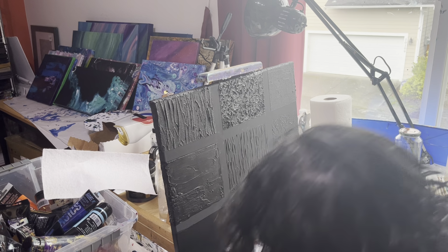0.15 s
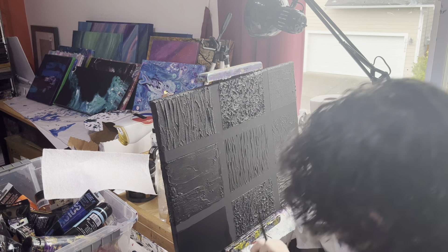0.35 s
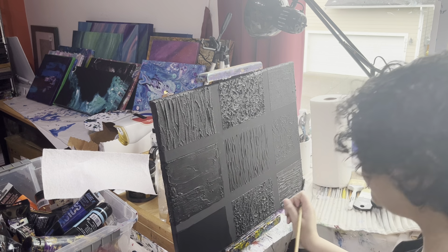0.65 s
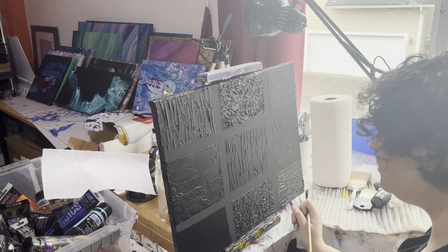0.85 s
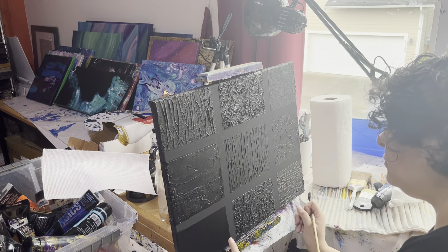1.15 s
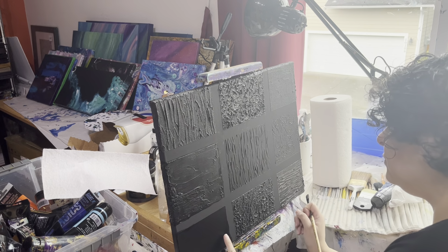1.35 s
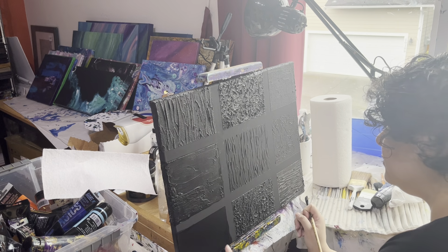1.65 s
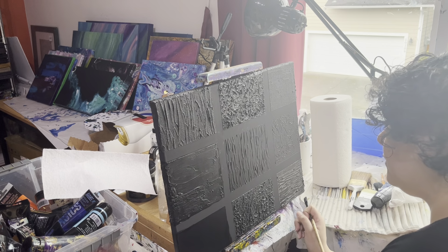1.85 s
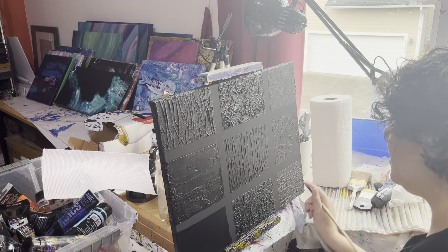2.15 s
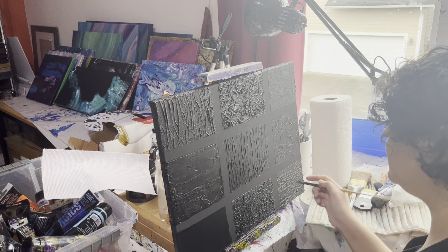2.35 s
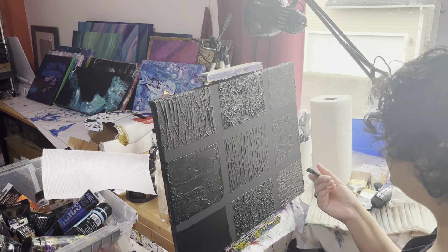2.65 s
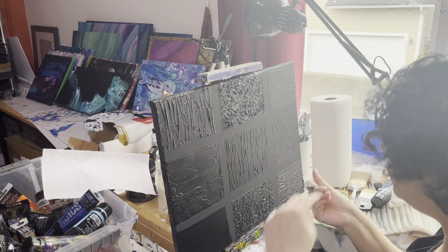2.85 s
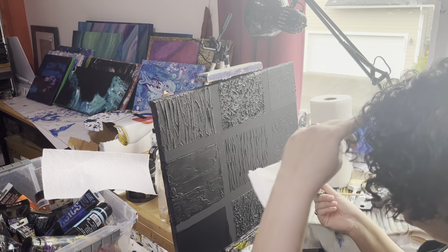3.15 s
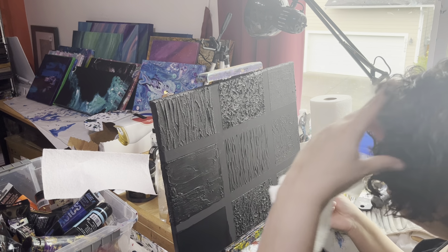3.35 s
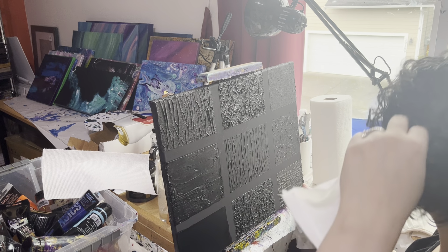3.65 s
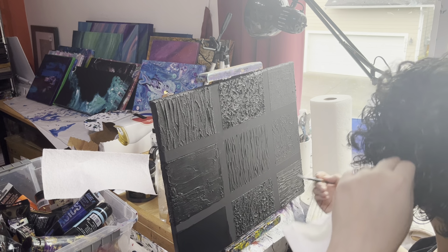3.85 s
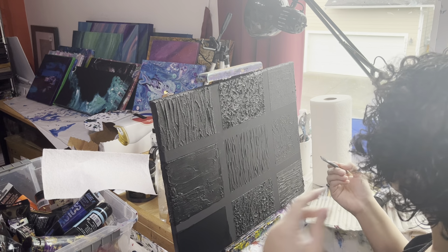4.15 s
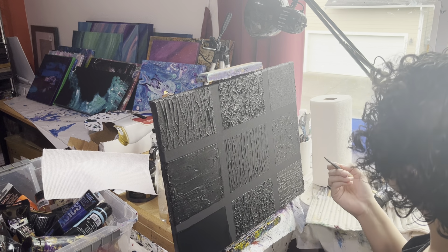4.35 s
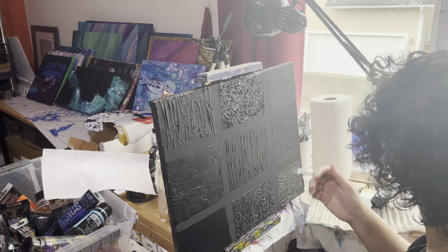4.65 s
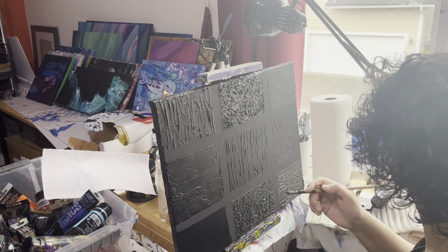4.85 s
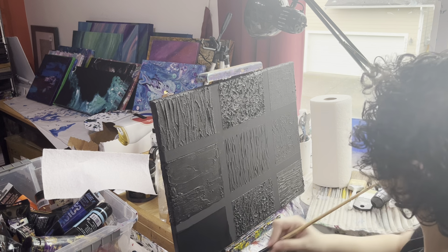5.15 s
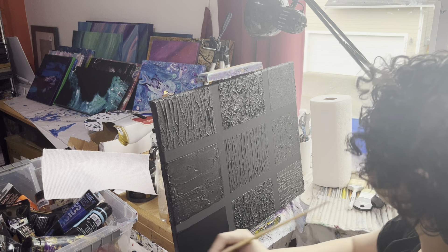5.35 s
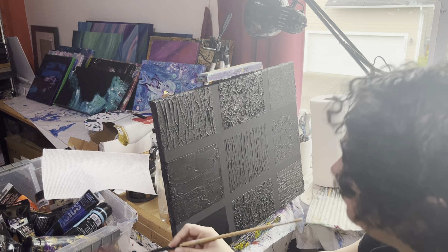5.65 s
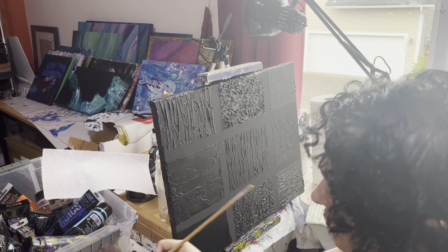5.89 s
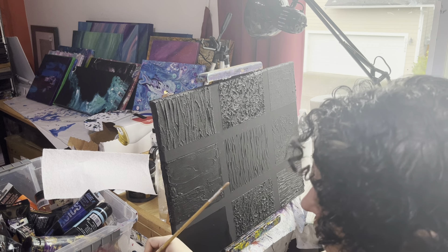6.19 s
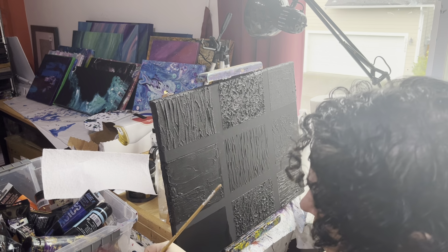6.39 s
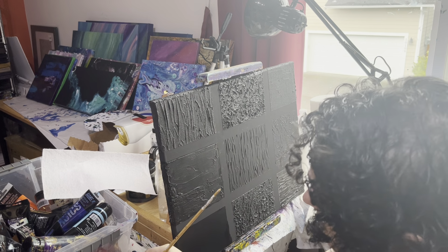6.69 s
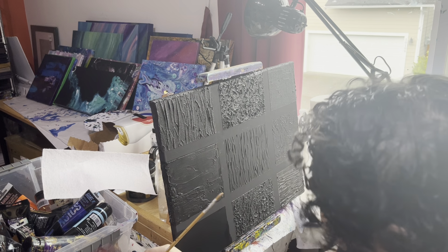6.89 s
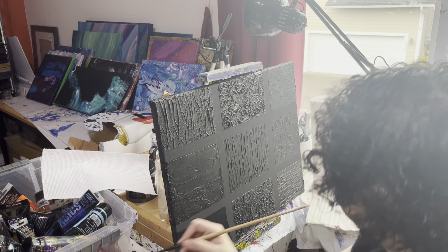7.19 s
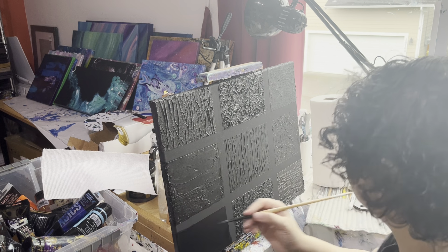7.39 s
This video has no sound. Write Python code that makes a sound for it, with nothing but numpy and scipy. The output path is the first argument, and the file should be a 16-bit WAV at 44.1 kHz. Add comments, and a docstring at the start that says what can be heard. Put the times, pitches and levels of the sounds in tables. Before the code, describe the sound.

A deep, steady motor hum, slightly wavering, lies under faint room air and a barely audible thin whine for the whole stretch. From 0 to 1.1 s a painter moves about, with overlapping crackly swishes of cloth, paper and bristles, rubbing drags on the table and a few small clicks. Light wooden ticks follow from 1.2 s, bunching with a short scuff at about 1.75 s. Rustling returns at 2.3 to 2.9 s with a soft bump at 2.4. A strong hollow table knock with a rattle lands near 3.1 s, another near 3.9. Smaller bumps and a brush of cloth come at 4.5 to 5.1 s. A lull holds only sparse, faint rustles until delicate taps at 6.6 to 7.0 s. A harder, brighter cluster of knocks and clatter strikes near 7.3 s, with small bumps to the end. Close stereo microphone, small dry room.

```python
"""A motor hums under faint room air and a thin whine while a painter shifts about at a work table.
Swishes of cloth, paper and bristles (tilted noise) and drags (rubbing noise, part through table modes)
crowd the first second; ticks (damped sines with noise) run on to 1.8 s. From 2.4 to 5.1 s bumps excite
the table modes and a rattle, strongest near 3.1 and 3.9 s. A lull follows, with sparse rustles, then taps
from 6.6 s and a last cluster of bumps near 7.3 s. Two ports hear all this with differing treble phase."""
import sys
import numpy as np
from scipy import signal
from scipy.fft import rfft, irfft, next_fast_len
from scipy.io import wavfile

SR = 44100
rng = np.random.default_rng(int(sys.argv[2]) if len(sys.argv) > 2 else 0)


def persist_wave(psi):
    """Save psi, clipped to +-1, as 16-bit WAV."""
    counts = np.round(np.clip(psi, -1, 1) * 32767).astype(np.int16)
    wavfile.write(sys.argv[1], SR, np.atleast_2d(counts).T)


N = 331896


def from_db(db):
    """Level: decibels to amplitude gain."""
    return 10 ** (np.asarray(db) / 20)


def rms_one(x):
    """Normalisation: scale to unit rms."""
    return x / np.sqrt(np.mean(x ** 2) + 1e-20)


def in_time(rows):
    """Linear interpolation: columns of a curve in time, one value a sample."""
    s, *columns = np.transpose(rows)
    return [np.interp(np.arange(N) / SR, s, column) for column in columns]


def at_hz(points, hz):
    """Logarithmic frequency axis: value of a spectrum at a frequency."""
    point_hz, values = np.array(points).T
    return np.interp(np.log(hz), np.log(point_hz), values)


def drift(rate):
    """Random modulation: low-passed noise of unit rms, with its corner at the rate in Hz."""
    step = 40   # samples between slow draws
    r = np.exp(-2 * np.pi * rate * step / SR)
    draws = rng.standard_normal(N // step + 2002)
    slow = signal.lfilter([1], [1, -2 * r, r * r], draws)[2000:]
    return np.interp(np.arange(N) / step, np.arange(len(slow)), rms_one(slow))


def ring(drive, hz, t60):
    """Damped resonance: a unit click starts a decaying sine of initial height 1."""
    r, w = from_db(-60 / (t60 * SR)), 2 * np.pi * hz / SR
    return signal.lfilter([0, np.sin(w)], [1, -2 * r * np.cos(w), r * r], drive + 1e-18)


def panned(db, pan_db):
    """Level difference between ports: left and right gains."""
    return from_db([db + pan_db / 2, db - pan_db / 2])


# Likeness of left and right noise: (frequency [Hz], correlation [0 to 1])
LIKENESS = [(60, 0.98), (150, 0.87), (300, 0.9), (600, 0.47), (1200, 0.15), (2500, 0.98), (5000, 0.52),
            (9000, 1), (14000, 0.99)]


def bands(white, spectrum, low_hz, high_hz):
    """Partial coherence: third-octave stereo bands mixed from (draw, mid/side, N) noise."""
    count = round(3 * np.log2(high_hz / low_hz))
    edges = np.geomspace(low_hz, high_hz, num=count + 1)
    for k, (low, high) in enumerate(zip(edges, edges[1:])):
        band_pass = signal.butter(2, [low, high], "band", fs=SR, output="sos")
        mid, side = signal.sosfilt(band_pass, white[k % 2])   # neighbouring bands use different draws
        hz = np.sqrt(low * high)
        alike = np.clip(at_hz(LIKENESS, hz), 0, 1)
        stereo = np.sqrt(1 + alike) * mid + np.sqrt(1 - alike) * side * [[1], [-1]]
        yield hz, from_db(at_hz(spectrum, hz)) * stereo


# Spectrum of the room air: (frequency [Hz], relative density [dB per Hz])
AIR = [(25, -19), (38, -5.5), (48, -1), (75, 6), (130, -4), (250, -11), (450, -17), (750, -20.5),
       (1000, -29.5), (1800, -36), (4000, -36.5), (6000, -41), (9000, -42.5), (12000, -45), (14000, -48),
       (15500, -57)]
AIR_DB = -66   # level of the air noise, patchiness included [dB rms]


def air():
    """Stationary broadband noise: shaped by bands, each slightly patchy in level."""
    noise = bands(rng.standard_normal((2, 2, N)), AIR, 22, 16000)
    patchy = sum(band * from_db(0.71 * drift(0.74)) for hz, band in noise)
    return from_db(AIR_DB) * rms_one(patchy)


WHINE_HZ, WHINE_T60_S = 5290, 0.03
WHINE_DB, WHINE_FLICKER_DB = -103, 5.5   # middle level, rms flicker about it


def whine():
    """Narrow-band resonance: noise passes twice through one mode, and its level flickers."""
    once = ring(rng.standard_normal(N), WHINE_HZ, WHINE_T60_S)
    tone = ring(once, WHINE_HZ, WHINE_T60_S)
    return from_db(WHINE_DB + WHINE_FLICKER_DB * drift(5)) * rms_one(tone)


MOTOR_HZ = 58.82
HUM_WAVER_DB, HUM_WAVERS_PER_S = 1, 12   # random waver of the fundamental
# Swell of the fundamental: (time [s], level before waver [dB rms])
HUM_SWELL = [(0.0, -46), (0.02, -50.5), (1.42, -49.5), (1.49, -53.5), (1.86, -51), (3.9, -50), (3.96, -47),
             (4.17, -51.5), (4.38, -49), (4.53, -54), (4.59, -49), (4.74, -48.5), (4.99, -51.5),
             (5.03, -48), (5.39, -53.5), (5.43, -50.5), (7.44, -49), (7.53, -57)]
# Upper partials: (multiple of the motor rate [ratio])
HUM_MULTIPLES = [2, 3, 4, 4.5, 5, 6.5, 8, 9, 10, 11, 12, 13, 19, 40, 41, 70]
# Upper partials, in the same order: (level before waver [dB rms])
HUM_DB = [-74.5, -80, -75, -84.5, -91, -87, -88.5, -89.5, -85, -89.5, -89, -94.5, -100, -103, -107, -106]


def hum():
    """Additive synthesis: compressor motor rate and multiples; upper partials waver, unequal in phase."""
    turn = 2 * np.pi * MOTOR_HZ * np.arange(N) / SR
    swell_db = in_time(HUM_SWELL)[0] + HUM_WAVER_DB * drift(HUM_WAVERS_PER_S)
    out = np.sqrt(2) * from_db(swell_db) * np.sin(turn) * np.ones((2, 1))
    for multiple, level_db in zip(HUM_MULTIPLES, HUM_DB):
        skew = 0.07 * multiple * rng.normal() * np.array([[1], [-1]])
        wander = 0.64 * drift(3.6)   # moving air bends the path
        phase = multiple * turn + rng.uniform(0, 2 * np.pi) + wander
        out += np.sqrt(2) * from_db(level_db + 3.33 * drift(5.2)) * np.sin(phase + skew)
    return out


ROOM_T60_S, WALL_CUT_HZ = 0.33, 2500   # decay before wall loss, corner of wall loss


def room(x):
    """Recirculating reflections: eight feedback delays a side, duller on every round."""
    size = next_fast_len(N + SR)
    hz = np.arange(size // 2 + 1) * SR / size
    wall = 1 / (1 + 1j * hz / WALL_CUT_HZ)
    answer = np.zeros((2, len(hz)), complex)
    lags_s = np.geomspace(.011, .037, num=16) * rng.uniform(.97, 1.03, 16)
    for k, lag in enumerate(lags_s):
        loop = from_db(-60 * lag / ROOM_T60_S) * wall ** 0.53 * np.exp(-2j * np.pi * hz * lag)
        answer[k % 2] += loop / (1 - loop) * (-1) ** (k // 2)
    return irfft(rfft(x.mean(axis=0), size) * answer, size)[:, :N]


# Modes of the table top: (frequency [Hz], relative level [dB], decay time t60 [s])
TABLE = [(137.2, 3, 0.18), (170.2, -10.5, 0.2), (198.2, -4.5, 0.33), (249.2, 2, 0.1), (334, -5.5, 0.2),
         (363.6, -9, 0.41), (450, -1.5, 0.11), (490.6, 1, 0.084), (596, -7, 0.14), (696, -19.5, 0.24),
         (829, -10, 0.1), (1104, -11, 0.15), (1218, -14, 0.11), (1675, -17, 0.081), (1744, -10, 0.071),
         (2010, -19, 0.09), (2186, -13.5, 0.059), (2800, -28, 0.053)]


def table(deep, low, high):
    """Modal superposition: neighbours in opposite sign, each drifting in strength at either port."""
    out = 0
    for k, (hz, level_db, t60) in enumerate(TABLE):
        share = (-1) ** k * from_db(level_db + 2 * np.array([drift(2), drift(2)]))
        drive = deep if hz < 220 else low if hz < 800 else high
        out = out + ring(share * drive, hz, t60)
    return out


SLOPE_DB = 20   # climbed in one attack time, lost in one release time


def strokes(rows, colour_db=0):
    """Energy addition: gain of overlapping strokes of attack, hold and release, summed in power."""
    s, hold, level_db, attack, release = np.array(rows)[:, :5].T[:, :, None]
    t = np.arange(0, N + 44, 44) / SR
    before = np.maximum(s - t, 0) / np.maximum(attack, .005)
    after = np.maximum(t - s - abs(hold), 0) / np.maximum(release, .005)
    stroke_db = level_db + np.reshape(colour_db, (-1, 1)) - SLOPE_DB * (before + after)
    power = from_db(stroke_db) ** 2
    return np.interp(np.arange(N) / SR, t, np.sqrt(power.sum(axis=0)))


# Arms and things dragging on the table:
# (time at full level [s], hold [s], relative level [dB], attack [s], release [s])
DRAGS = [(0.0, .001, -59, .02, 0.055), (.14, .001, -58.5, 0.026, 0.1), (.27, .1, -66, 0.041, .05),
         (.48, .001, -51.5, 0.053, 0.15), (.56, 0.032, -53.5, 0.083, 0.24),
         (.86, 0.00092, -52.5, 0.017, 0.0078), (.96, 0.069, -62, 0.13, .05),
         (1.015, 0.022, -53.5, 0.045, 0.11), (1.742, 0.013, -48, 0.06, 0.11), (2.29, .07, -69, 0.05, 0.12),
         (2.41, 0.0011, -61, 0.08, 0.1), (2.45, 0.27, -63.5, .05, .05), (2.9, 0.072, -87, .03, .05),
         (3.25, 0.056, -73, 0.12, 0.033), (3.674, .001, -63, .022, 0.041), (3.7, 0.3, -62, .05, 0.052),
         (4.05, .001, -72, 0.091, 0.22), (4.26, .001, -83, .04, 0.12), (4.456, .001, -70, 0.15, .015),
         (4.566, 0.23, -60, 0.077, 0.053), (4.962, .001, -64, 0.036, .035), (5.01, 0.22, -69.5, .05, 0.17)]


def drag():
    """Friction excitation: lumpy rubbing, part heard directly, part through the table modes."""
    rub = rng.standard_normal((2, N)) * from_db(2.4 * drift(25))
    band_pass = signal.butter(2, [140, 750], "band", fs=SR, output="sos")
    direct = rms_one(signal.sosfilt(band_pass, rub))
    through_table = rms_one(table(0.36 * rub.sum(axis=0), rub, 0.076 * rub))
    return strokes(DRAGS) * (0.41 * direct + 0.74 * through_table)


TICK_RISE_S, TICK_CYCLES, SNAP_S = 0.00024, 6, 0.0012   # contact time, ring to 1/e, snap to 1/e
TAIL_WIDTH = 1.22   # ratio from a tick's pitch to either edge of its tail
# Ticks of handle and bristles; snap (rms over its first 2 ms) and tail are relative to the tick's level:
# (time [s], level [dB], pitch [Hz], snap [dB rms], left-right [dB], grainy tail [dB rms])
TICKS = [(0.145, -72, 4450, -12, -2, -20), (.6, -54, 2000, -3, 2, -12), (.813, -64, 3750, -13, -2, -16),
         (0.846, -58, 3770, -9, 3, -19), (0.269, -56, 1350, -8, -1, -13), (0.992, -74, 1000, -9, 2.0, -21),
         (1.238, -54, 2300, 0, -0.5, -24), (1.2986, -53, 3750, -11.5, 0, -35),
         (1.312, -66, 1280, 3, 0, -27), (1.5477, -64.5, 2980, -1, -2, -20), (1.57, -65, 4100, -5, -2, -22),
         (1.5838, -58.5, 2000, -2, -2, -31), (1.6816, -53, 3140, -14, -3, -22),
         (1.685, -58, 4300, -20, 0, -28), (1.7315, -51, 3460, -20, -1, -21),
         (1.7295, -59, 4450, -18, 0, -23), (1.74, -57, 4550, -22, 0, -25),
         (1.751, -48.5, 2720, -25, -2, -38), (1.75, -48, 4450, -25, 0, -31),
         (1.767, -59, 3400, -20, 3, -21), (2.3555, -68, 1750, -11, 0, -20),
         (2.512, -55, 4240, -20, -2, -18), (2.4705, -58, 4000, -15, 2, -21),
         (2.7483, -57, 1480, 3.5, 1, -18.5), (3.0035, -66, 3700, -10, 7, -22),
         (3.028, -58, 1260, -34, -7, -22.5), (3.0885, -53, 1850, -23, -1, -23.5),
         (3.445, -61, 3400, -19, 5, -26), (3.657, -70.5, 1200, -22, 1, -14.5),
         (3.701, -66, 1150, -25, -5, -21.5), (3.79, -70.5, 1200, -18, 0, -14.5),
         (3.846, -80, 1200, -18, 6, -15), (3.876, -56.5, 1150, -24, 0, -27.5),
         (4.9996, -71, 1080, -6, -10, -16), (6.5955, -65, 1000, -19, -1, -15),
         (6.6033, -60, 3240, -11, 3, -24), (6.6138, -64, 1600, -4, -1, -24),
         (6.6293, -69, 1210, -28, 3, -20), (6.6457, -52.5, 1250, -15, 0, -26),
         (6.647, -57.5, 2300, -22, 2, -21), (6.681, -66, 1210, -20, -4, -19),
         (6.719, -79, 4000, -25, 3, -16), (6.748, -70, 3660, -25, 3, -23), (6.753, -66, 1220, -24, 1, -24),
         (6.932, -53.5, 1400, -26, 0, -23.5), (6.934, -76, 3500, -5, 1, -21),
         (6.9493, -61, 1480, -29, -5, -25.5), (6.99, -69, 1440, -21, 5, -18),
         (7.011, -69, 1280, -23, 4, -25), (7.2945, -40.5, 1780, -39, 1, -37),
         (7.294, -49, 2190, -37, 4, -34)]


def ticks():
    """Impact transient: a knock of wood rings briefly, with a snap on top and a grainy tail."""
    out = np.zeros((2, N))
    age = np.arange(round(.12 * SR)) / SR
    contact = 1 - np.exp(-age / TICK_RISE_S)
    snap_filter = signal.butter(2, [1600, 9000], "band", fs=SR)
    for s, level_db, hz, top_db, pan_db, tail_db in TICKS:
        knock = np.sin(2 * np.pi * hz * age) * np.exp(-age * hz / TICK_CYCLES) * contact
        crack = rng.standard_normal(len(age)) * np.exp(-age / SNAP_S) * contact
        snap = signal.lfilter(*snap_filter, crack)
        snap = snap / np.std(snap[age < .002])
        tail_filter = signal.butter(1, [hz / TAIL_WIDTH, hz * TAIL_WIDTH], "band", fs=SR)
        tail = signal.lfilter(*tail_filter, rng.standard_normal((2, len(age))))
        tail = rms_one(tail * np.exp(-age / 0.039))
        tick = knock + from_db(top_db) * snap + from_db(tail_db) * tail
        start = round(s * SR)
        out[:, start:start + len(age)] += panned(level_db, pan_db)[:, None] * tick
    return out


DULL_S, CRISP_S = 0.033, 0.034   # fall to 1/e of the dull and the bright rattle, nearly alike
RATTLE_LEAD_S = 0.0029   # clutter stirs before the table top swings
STRIKE_DB = -7.5   # hard edge of a bump, straight into the high modes
THUMP_HZ, THUMP_T60_S = 447, .027   # hollow under the table
# Loose things rattling around a bump, from just before it: (frequency [Hz], relative density [dB per Hz])
RATTLE = [(150, 13.5), (300, 12), (600, 9.5), (900, 4.5), (1400, 0.5), (2100, -8), (3000, -18),
          (4500, -26.5), (6500, -50), (8000, -50)]
# Bumps on the table; depth acts below 220 Hz and crispness above 2.5 kHz:
# (time [s], drive level [dB], depth [dB], rattle [dB], left-right [dB], crispness [dB])
BUMPS = [(2.407, -42.5, -9.5, -19, -3, 2), (2.533, -53, -5, -18, -1, 0), (3.025, -52.5, -11, -12.5, 4, 10),
         (3.0924, -28, -10.5, -15.5, -4, -1.5), (3.119, -53, -7, -7.5, 0, -7),
         (3.139, -56.5, 8, -5, -1, -4), (3.17, -46, -13, -25, 1, -5), (3.67, -45.5, -10, -34, 2, -3),
         (3.759, -50, -11, -34, 1.5, 4), (3.878, -34, -10, -17.5, -4.5, -3), (3.947, -53, -23, -19.5, 2, 3),
         (4.561, -46, -6, -20, -2, 0), (4.629, -54.5, -2, -32, -3, 2), (4.664, -53, -9, -27, -0.5, -4),
         (4.699, -58, -19, -21, -1.5, 0), (4.744, -51, -4.5, -31, 2, -2), (4.958, -55, -5, -28, -6, 0),
         (5.002, -49.5, -8.5, -20, -2, 0), (5.059, -54.5, -1, -19, 0, 0), (6.647, -58, -18, -22, 0, 0),
         (6.935, -58.5, -15, -4, 2, 0), (7.28, -29, -19, -7.5, 1, 1), (7.294, -37.5, -24, -13, -10, 11),
         (7.308, -34.5, -15, -29, -6, 15), (7.339, -41.5, -14, -15.5, 3, 10.5), (7.365, -52, -13, -9, 0, 6),
         (7.478, -48, -10, -9.5, -5, -15), (7.505, -49, 0, -29, 1, -9)]


def bumps():
    """Impulse response: a soft push rings low modes and hollow; shaken clutter feeds the high modes."""
    deep, low, shake = np.zeros((3, 2, N))
    for s, level_db, depth_db, rattle_db, pan_db, crisp_db in BUMPS:
        at, gains = round(s * SR), panned(level_db, pan_db)
        low[:, at] += gains
        deep[:, at] += gains * from_db(depth_db)
        shake_db = level_db + rattle_db
        shake[:, at - round(RATTLE_LEAD_S * SR)] += from_db([shake_db, shake_db + crisp_db])

    dull_fall, crisp_fall, rise = np.exp(-1 / (SR * np.array([DULL_S, CRISP_S, .002])))
    dying = [signal.lfilter([1], [1, -dull_fall], shake[0]), signal.lfilter([1], [1, -crisp_fall], shake[1])]
    dull, crisp = signal.lfilter([1 - rise], [1, -rise], dying) * from_db(2.2 * drift(57))
    dull_bands = bands(rng.standard_normal((2, 2, N)) * dull, RATTLE, 121.7, 2420)
    crisp_bands = bands(rng.standard_normal((2, 2, N)) * crisp, RATTLE, 2730, 6300)
    rattle = sum(band for hz, band in dull_bands) + sum(band for hz, band in crisp_bands)

    soft = signal.butter(2, 900, fs=SR)
    pushes = np.array([from_db(-5.0) * deep, from_db(-12.0) * low])
    deep_push, low_push = signal.lfilter(*soft, pushes + 1e-18)
    clatter = from_db(-28) * dull * rng.standard_normal((2, N))
    rung = table(deep_push, low_push, clatter + from_db(STRIKE_DB) * shake[0])
    # two resonances in series swell for a few cycles, then die
    thump = ring(ring(low, THUMP_HZ, THUMP_T60_S), THUMP_HZ, THUMP_T60_S)
    return rung + rattle + from_db(-37.0) * thump


GRITS_PER_S, GRIT_CYCLES = 120, 15   # mean rate in each band, cycles to fall 60 dB


def grit(hz):
    """Random impulse excitation: lone fibres snag and ring a few cycles near a pitch; rms 1."""
    struck = rng.random(N) < GRITS_PER_S / SR
    strength = from_db(2.4 * np.minimum(rng.exponential(1, N), 3))
    snags = struck * strength * rng.choice([-1, 1], N)
    return rms_one(ring(snags, hz, GRIT_CYCLES / hz))


GRIT_SHARE = 0.34   # level of snagging fibres against the hiss
# Common colour of the swishes: (frequency [Hz], relative density [dB per Hz])
SWISH_COLOUR = [(500, 1.5), (900, -1.5), (1400, -0.5), (2200, -3), (3200, -6.5), (4500, -5.5), (6500, -15),
                (9000, -7), (12000, -13.5), (15000, -11)]
# Swishes of cloth, paper and bristles; fullness acts below 2 kHz, edge from 3.3 kHz, sheen from 7.5 kHz:
# (time at full level [s], hold [s], relative level [dB], attack [s], release [s],
# fullness [dB], edge [dB], sheen [dB])
SWISHES = [(0.092, 0.035, -57.5, .08, .1, -1, 1.5, -0.5), (0.0, 0.16, -58, .02, 0.11, -4, -5, -6.5),
           (0.147, 0.016, -55.5, 0.042, 0.054, 2.5, 8, 1.5), (0.272, .001, -51.5, 0.043, 0.16, 0, 1.5, -2),
           (0.368, 0.067, -57.5, 0.3, 0.11, -2, 3.5, -1.5), (0.478, 0.11, -55.5, 0.22, 0.15, 1, 1, -3),
           (.6, .005, -56, .04, 0.047, -8, 0, -6), (0.691, 0.0093, -50.5, 0.21, 0.1, -1.5, -0.5, -3.5),
           (0.861, 0.028, -52.5, 0.19, 0.12, -3, 2.5, -3.5),
           (1.034, 0.084, -67, 0.091, 0.088, -27, 0, -3.5), (1.252, 0.0015, -63, 0.028, 0.2, -3.5, 2.5, -2),
           (1.325, 0.055, -73.5, 0.18, 0.11, 1.5, 8.5, 4), (1.591, 0.092, -60, 0.044, 0.12, -3.5, 3, 2),
           (1.743, .001, -52.5, 0.047, 0.042, -1, -1, -5), (1.781, .001, -64.5, 0.071, 0.11, 8, 0, 2),
           (2.025, .001, -66, 0.24, 0.11, -4, 2.5, -1.5), (2.165, .001, -74.5, 0.27, 0.57, 0, 7, 5.5),
           (2.351, .001, -59, .15, 0.31, 0.5, 2.5, -3.5), (2.49, 0.058, -63.5, 0.03, 0.092, -1, 7, 0),
           (2.644, .001, -54, 0.25, 0.15, -2, -0.5, -5), (2.787, 0.018, -55.5, 0.13, 0.05, -11, -2.5, -11),
           (2.862, .001, -59.5, 0.19, 0.12, -1.5, 0, -4), (3.28, .001, -74, 0.42, 0.28, -2.5, -2, -1.5),
           (3.478, 0.012, -69, 0.08, 0.1, -11, 2, 0), (3.7, .001, -84, 0.38, 0.36, 6, 5, 4),
           (4.285, .001, -68.5, 0.17, 0.034, -1, -1.5, -7), (4.45, .001, -66, 0.17, 0.25, -5.5, 0.5, -3.5),
           (4.581, 0.032, -56.5, 0.045, 0.32, -10, -1, -5.5), (4.8, 0.00056, -77, 0.29, 0.051, 0, 8.5, -2),
           (4.904, .001, -74.5, .1, .1, -12, 5, -5), (5.001, .001, -65.5, 0.16, 0.1, -0.5, 4.5, 0),
           (5.17, .001, -83.5, 0.21, 0.13, 0, 6, 14), (5.37, 0.072, -65.5, 0.23, 0.11, -6.5, -2.5, -4.5),
           (5.793, 0.028, -78, 0.69, 0.38, 2.5, 2.5, -1.5), (6.604, 0.04, -74, 0.016, .05, 4, -7, 2),
           (6.649, .001, -64, 0.05, 0.048, 10, -4, -16), (6.727, 0.022, -76, 0.11, 0.037, 2, -7, -9),
           (7.426, 0.075, -76, 0.28, .1, 11, 3.5, -1)]


def swish():
    """Stick-slip friction: fibres slip in dense uneven grains, so the hiss crackles in tilted colours."""
    full_db, edge_db, sheen_db = np.array(SWISHES)[:, 5:].T
    full, plain, edge, sheen = [strokes(SWISHES, db) for db in (full_db, 0, edge_db, sheen_db)]
    grain = from_db(2.2 * np.minimum(rng.exponential(1, N), 6) + 0.82 * drift(44))
    grainy_noise = rng.standard_normal((2, 2, N)) * rms_one(grain)
    out = 0
    for hz, band in bands(grainy_noise, SWISH_COLOUR, 450, 16000):
        level = full if hz < 2000 else plain if hz < 3300 else edge if hz < 7500 else sheen
        band = band + GRIT_SHARE * np.std(band) * grit(hz)
        flicker = from_db(2.0 * drift(10.0) + 1.15 * drift(30))
        out = out + band * level * flicker
    return out


def scene():
    """Linear superposition: every source at the two ports, with the room's answer to bumps and ticks."""
    knocks, taps = bumps(), ticks()
    reflected = room(from_db(-15) * knocks + from_db(-22.5) * taps)
    return air() + whine() + hum() + drag() + taps + knocks + swish() + reflected


CUTOFF_HZ = 15700
# Phase between ports: (frequency [Hz], lead of the left port [rad])
PORT_LEAD = [(0, 0), (1500, 0), (2840, .7), (4570, .7), (5600, -.6), (8300, -3.14), (11800, -6.28),
             (15000, -9.45)]
# Level between ports: (frequency [Hz], left-right [dB])
PORT_BALANCE = [(60, 0.0), (150, -0.5), (380, -0.5), (950, -1), (2380, 1), (4200, 5), (7000, 0),
                (9500, -0.5), (15000, 0)]


def record(dry):
    """Linear filtering: the ports shift phase and level of left against right; the top is cut."""
    size = next_fast_len(N + 4096)
    hz = np.arange(size // 2 + 1) * SR / size
    lead = np.interp(hz, *np.transpose(PORT_LEAD))
    balance_db = np.interp(hz, *np.transpose(PORT_BALANCE))
    left = np.exp(.5j * lead) * from_db(balance_db / 2)
    ports = irfft(rfft(dry, size) * np.array([left, 1 / left]), size)[:, :N]
    top_cut = signal.ellip(12, .5, 70, CUTOFF_HZ, fs=SR, output="sos")
    return signal.sosfilt(top_cut, ports)


dry = scene()
out = record(dry)
persist_wave(out)
```